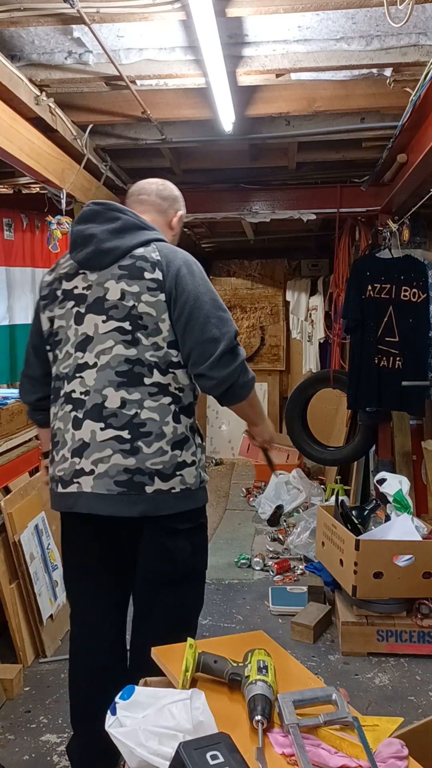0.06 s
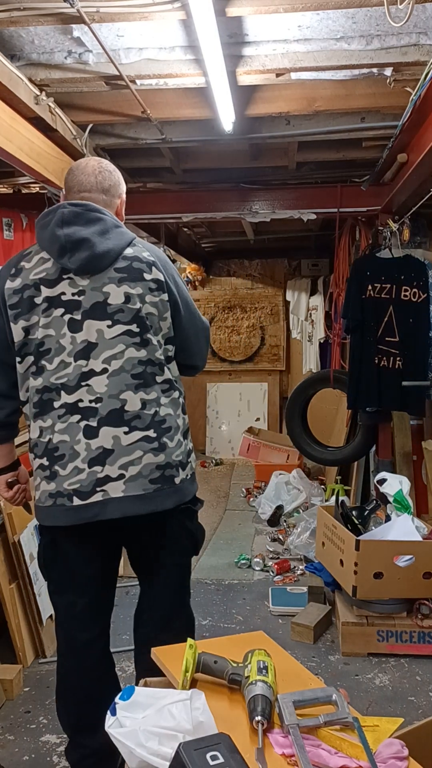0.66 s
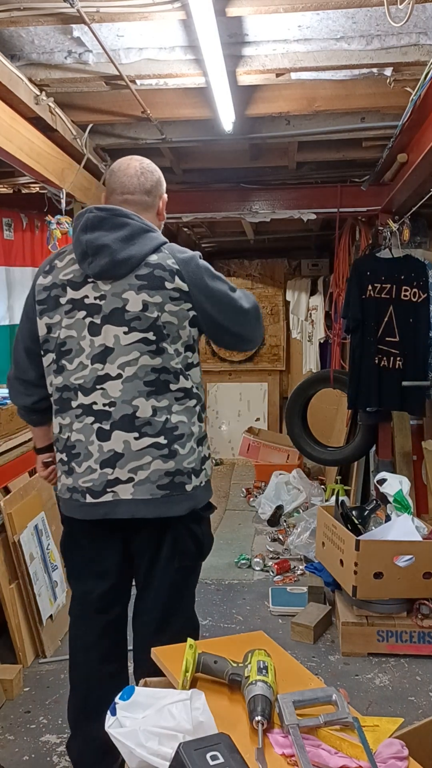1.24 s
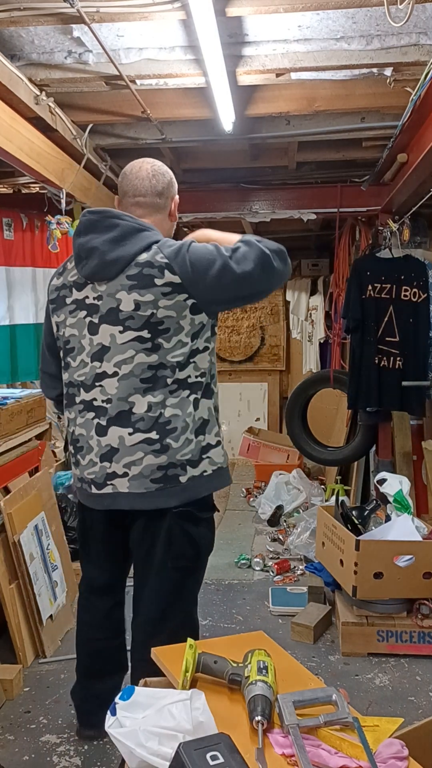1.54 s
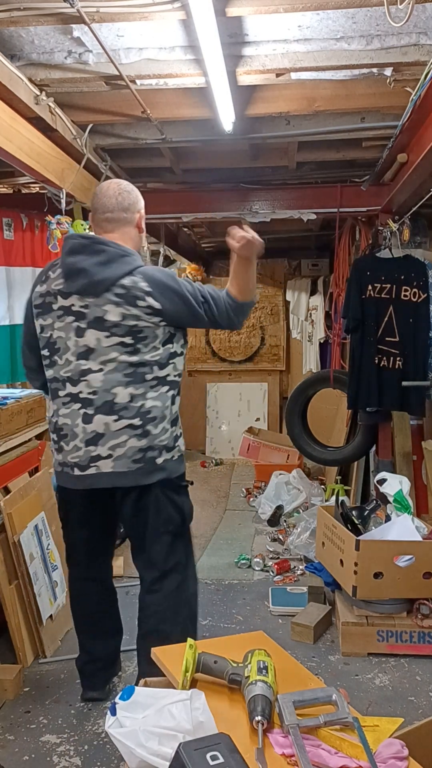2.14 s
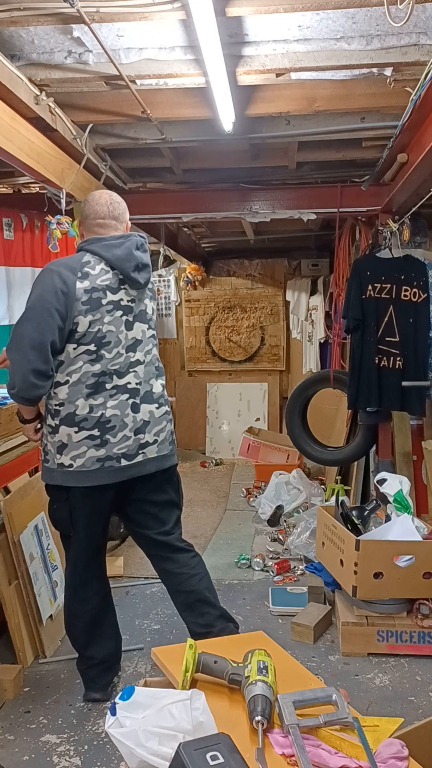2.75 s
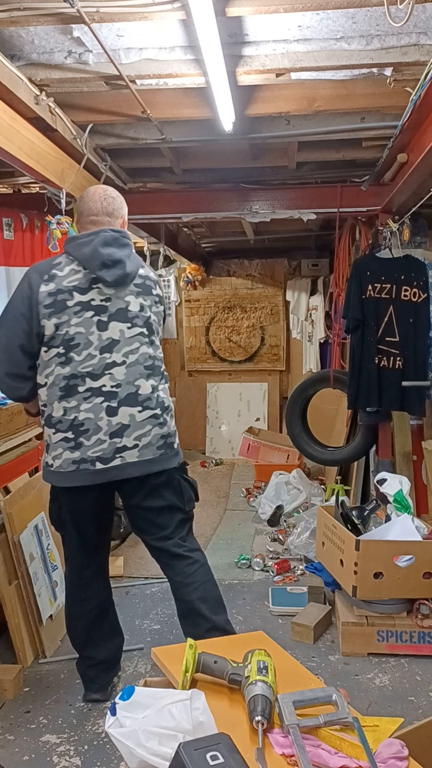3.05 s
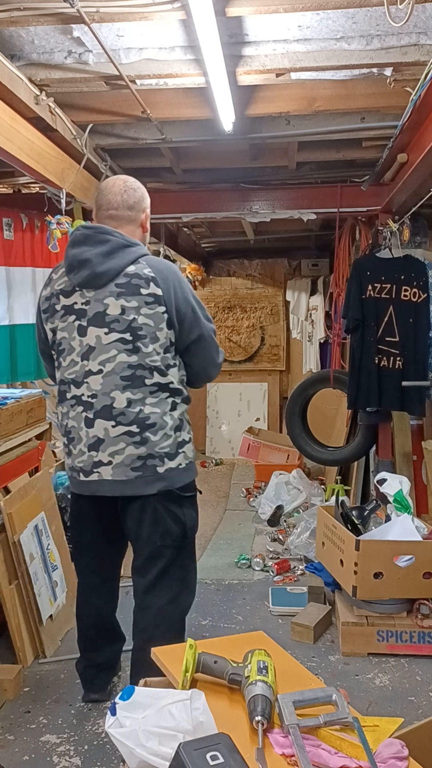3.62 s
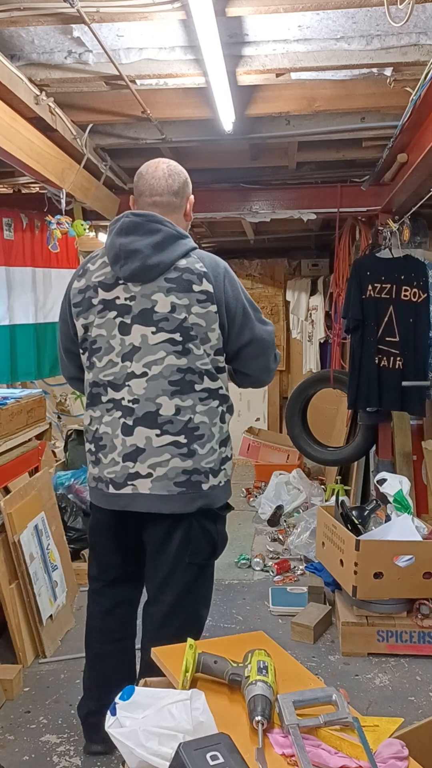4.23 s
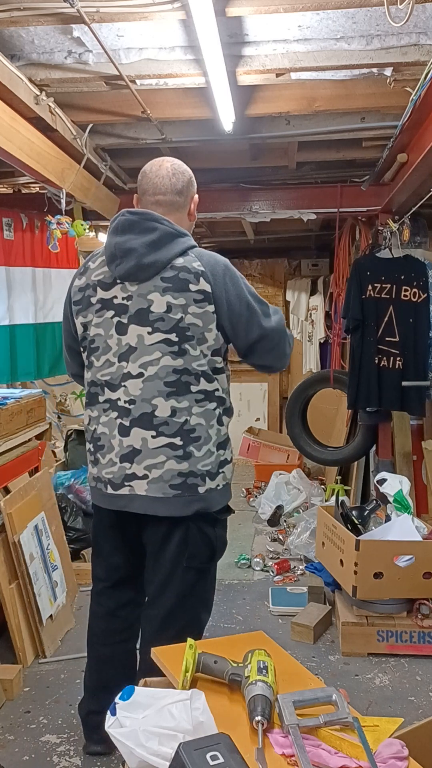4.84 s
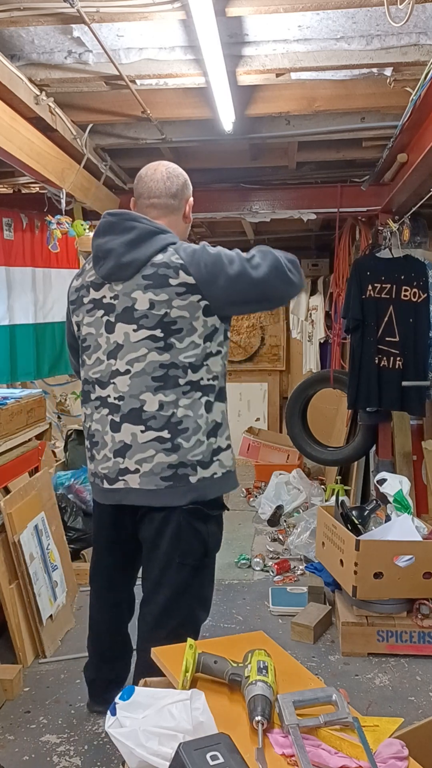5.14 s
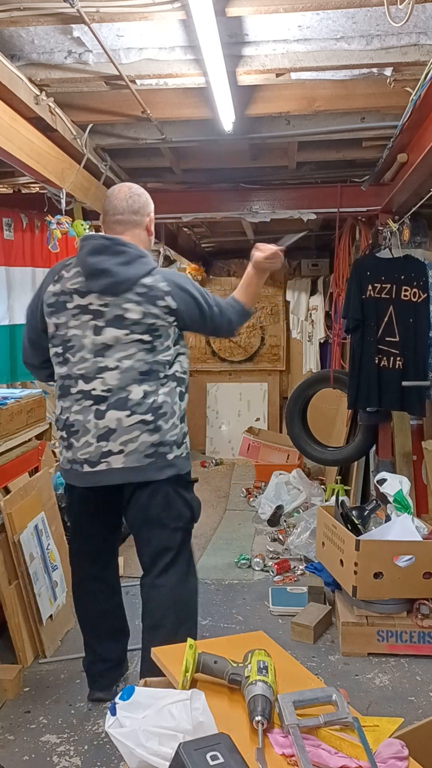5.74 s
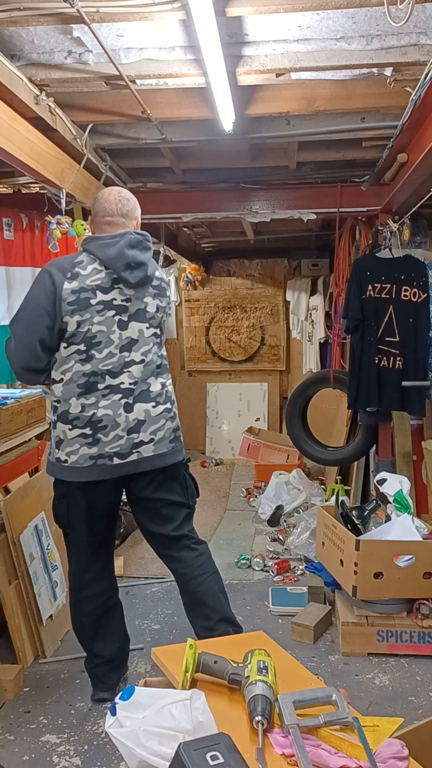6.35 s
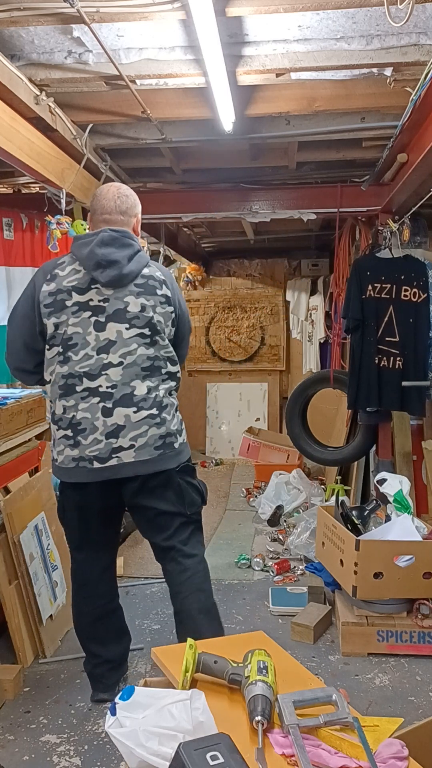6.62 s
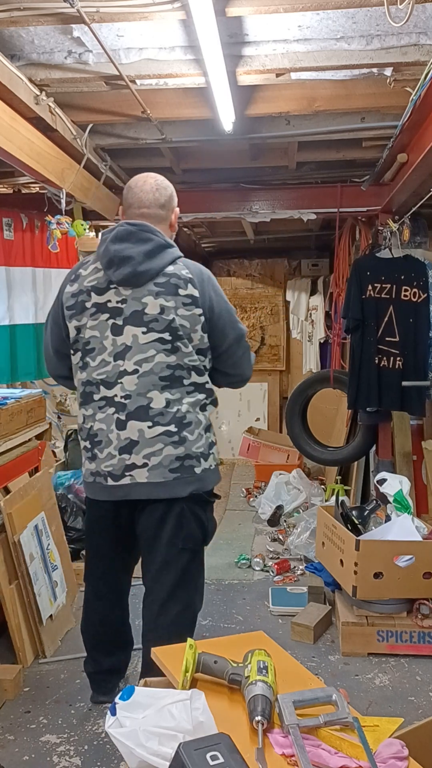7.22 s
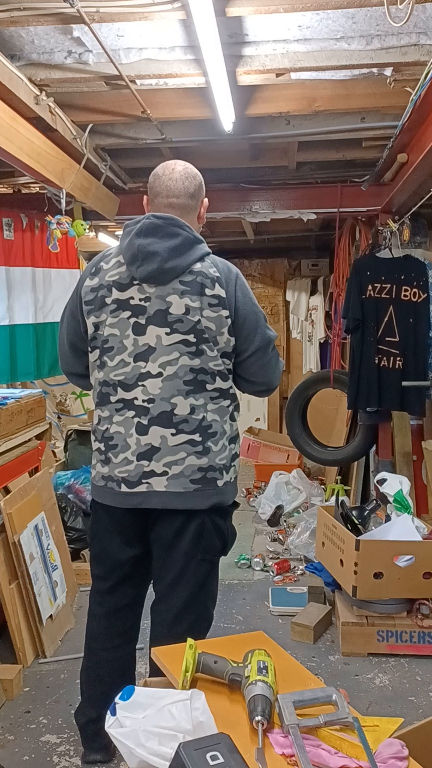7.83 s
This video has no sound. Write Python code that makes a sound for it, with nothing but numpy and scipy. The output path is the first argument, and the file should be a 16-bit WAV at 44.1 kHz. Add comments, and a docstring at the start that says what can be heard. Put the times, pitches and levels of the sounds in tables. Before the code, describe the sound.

Two knives are thrown into a wooden board about three and a half seconds apart, each with a faint hiss of release and then a loud, cracking thud that dies quickly in a small workshop. Between the throws come light steel clinks, a short rasp of blade on blade and a few scuffing steps. The hits sound slightly to the right and stand far above the soft sleeve rustle, shuffling feet and low room noise.

```python
"""Sleeves rustle and shoes shift in a quiet, cluttered workshop; then two knives thud into a target.
Each slips off the fingers with a faint swish, splits the wood fibres with its point, shudders, and
sets the wooden target and its backing board ringing. Between the throws the next blade rasps and
clinks off the others in the hand. Soles scuff on concrete, and soft room noise lies under it all."""
import sys
import numpy as np
from scipy import signal
from scipy.fft import rfft, irfft
from scipy.io import wavfile
from scipy.ndimage import uniform_filter1d, minimum_filter1d

SR = 44100
rng = np.random.default_rng(int(sys.argv[2]) if len(sys.argv) > 2 else 0)


def log_audio(samples):
    """Write samples as a 16-bit WAV file to the path given in sys.argv[1]."""
    # one column per channel
    frames = np.atleast_2d(samples).T
    # limit to full scale, then quantise
    limited = np.clip(frames, -1, 1)
    pcm = np.round(limited * 32767).astype(np.int16)
    wavfile.write(sys.argv[1], SR, pcm)


N = 347508

# one row a throw: start_s, bite_db, bite_tilt_db_per_octave, clatter_db, clatter_tilt_db_per_octave,
# shudder_hz, shudder_db, shudder_length_s
THROWS = [(2.5158, -39, -4, -22.5, -3.5, 663, -13.5, .021),
          (6.0828, -41, -5, -19, -1.45, 848, -20.5, 0.01404)]
# the point cracking in, one row a throw: pitch_hz, width_hz, crack_db, first_tick_db
CRACKS = [(2116, 310, -41.5, -40), (14000, 2500, -48.5, -52.5)]
# bright bite of splitting fibres: frequency_hz, density_db
BITE_SPECTRUM = [(500, -11), (2000, -2), (4000, 1.5), (6500, 4.5), (8500, -6.5), (11000, 6), (14500, 2.5),
                 (16000, -5.5)]
# the blade's knock on the face of the target: pitch_hz, width_hz, level_db
KNOCK_MODES = [(1150, 260, 0)]
# dense higher modes of the wood, mixed by the room: frequency_hz, density_db
CLATTER_SPECTRUM = [(25, -38), (45, -23.5), (110, -10.5), (300, -7.5), (700, -0.5), (1150, -4.5),
                    (1700, -11.5), (2300, -17), (3000, -20), (4500, -26.5), (8000, -44.5), (16000, -59.5)]
# low boom thrown back by the walls: frequency_hz, density_db
BOOM_SPECTRUM = [(50, -36), (115, 1), (175, -9.5), (245, -0.5), (330, -11.5), (480, -17.5), (800, -50.5),
                 (16000, -120)]
# weight of that boom, one value a throw: level_db
BOOM_DB = [-30.5, -23]

def knife_hits(knock_db=-28, tick_lead_s=.0013, shudder_delay_s=.0015, board_delay_s=.0038):
    """The point splits the fibres, the blade knocks and shudders, the board rings, the walls boom."""
    out = np.zeros((2, N))
    for throw, row in enumerate(THROWS):
        s, bite_db, bite_tilt, clatter_db, clatter_tilt, shudder_hz, shudder_db, shudder_s = row
        crack_hz, width_hz, crack_db, tick_db = CRACKS[throw]
        bite = amp(bite_db) * room_decay(noise(SR, BITE_SPECTRUM, tilt=bite_tilt), rise_s=.001)
        crack = amp(crack_db) * stroke(.0054, .026) * noise(SR, modes=[(crack_hz, width_hz, 0)], steep=1.4)
        tick = amp(tick_db) * stroke(.0015, .002) * noise(SR, BITE_SPECTRUM)
        splitting = (bite + crack) * grain(SR, depth_db=1.3, samples=50)
        knock = amp(knock_db) * stroke(.019, .0094) * noise(SR, modes=KNOCK_MODES, steep=2)
        clatter = room_decay(noise(SR, CLATTER_SPECTRUM, tilt=clatter_tilt), rise_s=.0045)
        thud = board_thud(spot=throw)
        boom = amp(BOOM_DB[throw]) * stroke(.062, .032) * noise(SR, BOOM_SPECTRUM)
        add(out, s - tick_lead_s, tick)
        add(out, s, splitting + knock + boom)
        add(out, s + shudder_delay_s, amp(clatter_db) * clatter)
        add(out, s + shudder_delay_s, amp(shudder_db) * blade_shudder(shudder_hz, shudder_s))
        add(out, s + board_delay_s, thud)
    return out


# body of the target on its board: pitch_hz, t60_s, first_spot_db, second_spot_db
BOARD_MODES = [(54, 0.44, -35, -38), (68, 0.39, -33, -32), (104, 0.28, -14.5, -13.5), (128, 0.24, -17, -11),
               (169, 0.28, -32, -30), (189, 0.26, -31, -19.5), (234, 0.28, -22, -29), (249, 0.24, -29, -13),
               (282, 0.24, -31, -24), (334, 0.21, -23, -14), (429, 0.25, -33, -24), (448, 0.24, -24, -30),
               (473, 0.19, -26, -19), (515, 0.23, -27, -21), (576, 0.22, -24, -29), (640, 0.16, -14.5, -25),
               (688, 0.17, -19, -21), (760, 0.16, -23, -19), (875, 0.16, -28, -18), (965, 0.16, -30, -19.5),
               (1117, 0.16, -28, -43), (1194, 0.15, -44, -29), (1249, 0.12, -27, -26),
               (1429, 0.12, -32, -39), (1503, 0.15, -49, -32), (1698, 0.14, -52, -34)]

def board_thud(spot, rise_s=.0075, spread_hz=1500):
    """The board's modes ring; where the point lands decides how strongly each one speaks."""
    t, out = np.arange(SR) / SR, np.zeros((2, SR))
    for k, (hz, t60_s, *spot_db) in enumerate(BOARD_MODES):
        # short waves reach the two sides out of step
        phase = np.array([[1], [-1]]) * rng.standard_normal() * hz / spread_hz / 2
        # neighbouring modes start in opposite directions, so the thud blooms
        ring = (-1) ** k * np.sin(2 * np.pi * hz * t + phase) * amp(-60 * t / t60_s)
        out += amp(spot_db[spot]) * pan_gains(curve(SOURCE_PAN, hz))[:, None] * ring
    return out * (1 - np.exp(-t / rise_s))


def blade_shudder(hz, length_s, taper=.3):
    """The blade shakes while it digs in, until the wood grips it."""
    t = np.arange(round(length_s * SR)) / SR
    burst = np.sin(2 * np.pi * hz * t) * signal.windows.tukey(len(t), taper)
    return pan_gains(curve(SOURCE_PAN, hz))[:, None] * burst


# blade along blade, light and then pressed:
# start_s, length_s, level_db, swell_db_per_s, ring_vs_rasp_db, low_notes_vs_rasp_db
DRAWS = [(3.36, 0.163, -70, 66, 0.63, 4.6), (3.535, 0.078, -57.5, 10, 5, 11.2)]
# dry rasp of steel on steel: frequency_hz, density_db
RASP_SPECTRUM = [(300, -34), (1200, 9), (2300, -1), (2850, -8), (3400, 12), (4300, -8.5), (5200, 17),
                 (7000, -10), (8600, -13), (10500, -18), (12800, 5), (13500, -28.5), (16000, -32)]
# the blades' low singing notes: pitch_hz, width_hz, level_db
LOW_NOTES = [(1700, 33, -5.5), (3125, 27, -9), (3330, 23, -8.5), (5056, 37, 4.5), (5100, 90, -9),
             (5640, 60, -27)]
# their other resonances: pitch_hz, width_hz, level_db
STEEL_MODES = [(2030, 54, -21), (2350, 200, -27), (3440, 140, -21.5), (4430, 460, -25), (5530, 53, -12),
               (7290, 210, -12.5), (9930, 79, -9), (11400, 110, -14), (12500, 100, -17), (14700, 120, -20)]

def blade_draw(grip_s=.01, let_go_s=.023, sing_s=.019):
    """Steel rubs on steel and rings as the next knife is drawn from the hand."""
    t, out = np.arange(SR) / SR, np.zeros((2, N))
    for s, length_s, db, swell, ring_db, notes_db in DRAWS:
        pressure = amp(db + swell * np.minimum(t, length_s))
        rubbing = np.minimum(t / grip_s, 1) * pressure * np.exp(-np.maximum(t - length_s, 0) / let_go_s)
        ring = amp(ring_db) * noise(SR, modes=STEEL_MODES)
        rasp = noise(SR, RASP_SPECTRUM) * grain(SR, depth_db=5.5)
        notes = amp(notes_db) * noise(SR, modes=LOW_NOTES) * grain(SR, depth_db=.5, samples=300)
        # the low notes build up and ring on behind the rubbing
        add(out, s, rubbing * (ring + rasp) + follow(rubbing, sing_s) * notes)
    return out


# light touches: start_s, level_db, rise_s, fade_s, tilt_db_per_octave, low_notes_vs_clink_db
CLINKS = [(2.902, -70.5, 0.017, 0.063, -7, -4), (2.943, -65, 0.029, 0.032, 1, 2),
          (3.18, -78, 0.023, .02, -9, -8), (6.618, -76.5, 0.0087, 0.026, 5.5, 6.5)]
# blades gripped together: pitch_hz, width_hz, level_db
GRIPPED_MODES = [(1660, 88, -8), (3520, 170, -11), (4930, 200, -12), (5420, 240, -2), (5862, 130, -13),
                 (6230, 550, -17), (7380, 220, -14), (10000, 92, -12), (11480, 67, -16), (12750, 120, -20)]

def blade_clinks():
    """The held blades touch and ring briefly, damped by the hand."""
    out = np.zeros((2, N))
    for s, db, rise_s, fade_s, tilt, notes_db in CLINKS:
        clink = noise(SR, modes=GRIPPED_MODES, tilt=tilt)
        notes = amp(notes_db) * noise(SR, modes=LOW_NOTES)
        add(out, s, amp(db) * stroke(rise_s, fade_s) * (clink + notes))
    return out


# letting go: start_s, level_db, hiss_tilt_db_per_octave, ring_vs_hiss_db, ring_rise_s, ring_fade_s
RELEASES = [(2.224, -63, 2.2, -2, .075, 0.077), (5.793, -60.5, -0.5, 1.5, 0.082, 0.034)]
# swish of steel over skin: frequency_hz, density_db
SWISH_SPECTRUM = [(60, -4.5), (220, 4.5), (600, 13.5), (1600, 7), (2800, -7), (4000, -9), (5600, -0.5),
                  (6700, -1), (8400, -21), (10000, -2), (12000, -1.5), (16000, -5)]
# shimmer of the freed blade: pitch_hz, width_hz, first_knife_db, second_knife_db
FREE_BLADE_MODES = [(3112, 120, -5, -24), (5050, 140, -1, -18), (6960, 90, 1, -7.5), (7480, 150, -5, -22),
                    (9490, 50, 0, -0.5), (9700, 350, -5.5, -13.5), (11000, 200, -5.5, -16.5),
                    (12220, 60, 5.5, -3.5), (12720, 200, -7, -27), (14150, 151.6, -5.5, -18),
                    (15390, 120, 0, -21)]

def knife_releases():
    """The thrown blade hisses over the fingers and sings faintly."""
    out = np.zeros((2, N))
    for knife, (s, db, tilt, ring_db, rise_s, fade_s) in enumerate(RELEASES):
        modes = [(hz, width_hz, knife_db[knife]) for hz, width_hz, *knife_db in FREE_BLADE_MODES]
        hiss = stroke(rise_s=.045, fade_s=.12) * noise(SR, SWISH_SPECTRUM, tilt=tilt)
        ring = amp(ring_db) * stroke(rise_s, fade_s) * noise(SR, modes=modes) * grain(SR, depth_db=2)
        add(out, s, amp(db) * (hiss + ring))
    return out


# shoe scuffs: start_s, level_db, length_s, tilt_db_per_octave
SCUFFS = [(3.69, -62, 0.092, -2), (4.1, -68.5, .09, -5.5), (4.222, -51.5, 0.092, 1), (7.135, -58, 0.09, -2)]
# scrape of a sole: frequency_hz, density_db
SOLE_SPECTRUM = [(40, -19), (130, -10), (230, -4), (380, 2), (800, 6.5), (1500, 2.5), (2300, -7.5),
                 (3400, -20), (4600, -11), (8500, -24), (11000, -18.5), (16000, -32)]
# footfalls: start_s, level_db, length_s, tilt_db_per_octave
TREADS = [(.42, -66, 0.084, 1), (.85, -73, 0.087, -10), (1.99, -68.5, 0.11, -5), (3.54, -67.5, 0.13, -6),
          (3.93, -71.5, 0.25, -11), (4.26, -57, 0.049, 15), (5.1, -71, 0.1, 5), (6.66, -68.5, 0.057, 1),
          (7.07, -66.5, .09, -4)]
# dull thump of the floor: frequency_hz, density_db
FLOOR_SPECTRUM = [(25, -27), (55, 1.5), (90, 4), (150, -28), (230, -21), (400, -30), (1500, -118),
                  (16000, -150)]

def footsteps():
    """Soles scuff on concrete and weight lands on the floor."""
    scuffs = rubs(SCUFFS, SOLE_SPECTRUM, grain_db=-.6, rise_share=.68)
    treads = rubs(TREADS, FLOOR_SPECTRUM, grain_db=3.5, rise_share=.29)
    return scuffs + treads


# soft bumps: start_s, level_db
BUMPS = [(.08, -71), (1.62, -70), (1.881, -70), (2.29, -68), (3.004, -65), (5.41, -64)]
# their hollow note, also the room's drone: pitch_hz, width_hz, level_db
HOLLOW_MODES = [(236, 13, 0)]
# voice of the creak underfoot: pitch_hz, width_hz, level_db
CREAK_MODES = [(228, 40, 6.5), (748, 70, -1), (1080, 200, -6), (1380, 60, 2.5), (1780, 170, -3),
               (2700, 200, -9), (3400, 350, -10.5), (5200, 900, -20), (11500, 2500, -30)]

def weight_shifts(creak_start_s=7.785, creak_db=-55):
    """Hollow bumps and one short creak as the thrower's weight moves."""
    out = np.zeros((2, N))
    for s, db in BUMPS:
        add(out, s, amp(db) * stroke(.013, .021) * noise(SR, modes=HOLLOW_MODES))
    add(out, creak_start_s, amp(creak_db) * stroke(.022, .035) * noise(SR, modes=CREAK_MODES))
    return out


# cloth moves: start_s, level_db, length_s, tilt_db_per_octave
RUSTLES = [(.2, -70, .09, -3.5), (.3, -69, 0.062, -1.5), (1.59, -65.5, 0.1, 3.5), (2.06, -81.5, .3, 8),
           (3.74, -77.5, 0.18, -0.5), (3.94, -72, 0.097, .5), (4.81, -82, 0.2, 2), (5.6, -77.5, .3, 4),
           (7.19, -77.5, 0.25, -2.5)]
# brush of fabric: frequency_hz, density_db
CLOTH_SPECTRUM = [(300, -4.5), (1500, 8), (3000, -4.5), (5000, 2), (6500, 2), (8300, -15), (11000, -6.5),
                  (16000, -22.5)]

def clothes(whisper_db=-86.5, sway_db=5, sway_s=.22):
    """Sleeves and trousers rustle, and whisper faintly as the thrower sways."""
    rustles = rubs(RUSTLES, CLOTH_SPECTRUM, grain_db=1, rise_share=.43)
    sway = np.tanh(wander(N, int(sway_s * SR)))
    return rustles + amp(whisper_db + sway_db * sway) * noise(N, CLOTH_SPECTRUM)


# room tone: frequency_hz, density_db
ROOM_SPECTRUM = [(20, -37.5), (40, -27), (65, -6.5), (105, -3.5), (170, -11), (235, -14.5), (300, -13),
                 (500, -13.5), (650, -9.5), (780, -0.5), (950, 0.5), (1280, -3), (1900, -23), (3400, -31),
                 (6200, -35), (9000, -37), (13500, -32), (16000, -40)]
# where it sits: frequency_hz, left_minus_right_db
ROOM_PAN = [(60, -2.5), (380, 0), (700, -8.5), (1290, -14), (2380, -1), (8000, -2.5), (15000, 0)]

def room_tone(start_db=-63.5, drift_db_per_s=-.2158, waver_db=.55, waver_s=.4, drone_db=-84):
    """Soft room noise, mostly to the right, wavers and sinks slowly over a faint hollow drone."""
    level_db = start_db + drift_db_per_s * np.arange(N) / SR + waver_db * wander(N, int(waver_s * SR))
    bed = amp(level_db) * noise(N, ROOM_SPECTRUM, pan=ROOM_PAN)
    return bed + amp(drone_db) * noise(N, modes=HOLLOW_MODES)


# the workshop's short tail: frequency_hz, t60_s
ROOM_T60 = [(50, 0.63), (200, 0.29), (700, 0.26), (2000, 0.23), (6000, 0.22), (15000, 0.24)]

def room_decay(x, rise_s):
    """Each band swells quickly and then fades with the room's decay time."""
    hz, t, bands = signal.stft(x, SR, nperseg=256)
    decay = amp(-60 * t / curve(ROOM_T60, hz)[:, None])
    faded = signal.istft(bands * decay, SR, nperseg=256)[1][:, :x.shape[1]]
    return faded * (1 - np.exp(-np.arange(x.shape[1]) / SR / rise_s))


# stereo width, narrow lows and wide highs: frequency_hz, left_right_likeness
LIKENESS = [(60, 0.8), (300, 0.88), (700, 0.84), (1400, 0.34), (3000, -0.14), (7000, 0), (16000, 0.02)]
# the action sits to the right: frequency_hz, left_minus_right_db
SOURCE_PAN = [(60, -1), (380, -0.5), (700, -5.5), (1290, -8), (2400, -6), (15000, -3.5)]

def noise(size, spectrum=None, modes=(), tilt=0, pan=SOURCE_PAN, steep=1.15):
    """Stereo noise of rms 1, coloured by a spectrum or by resonances and tilted in dB per octave."""
    hz = np.fft.rfftfreq(size, 1 / SR)
    left, other = rfft(rng.standard_normal((2, size)))
    likeness = np.clip(curve(LIKENESS, hz), 0, 1)
    pair = np.array([left, likeness * left + np.sqrt(1 - likeness ** 2) * other])
    if spectrum is None:
        peaks = (amp(2 * db) / (1 + (2 * (hz - f) / width) ** 2) ** steep for f, width, db in modes)
        colour = np.sqrt(sum(peaks))
    else:
        colour = amp(curve(spectrum, hz))
    slope = amp(tilt * np.log2(np.maximum(hz, 100) / 1000))
    return unit(irfft(pair * colour * slope * pan_gains(curve(pan, hz)), size))


def rubs(rows, spectrum, grain_db, rise_share):
    """Grainy strokes of shoe or cloth; each swells for a share of its length, then fades."""
    out = np.zeros((2, N))
    for s, db, length_s, tilt in rows:
        envelope = stroke(rise_share * length_s, (1 - rise_share) * length_s)
        add(out, s, amp(db) * envelope * noise(SR, spectrum, tilt=tilt) * grain(SR, grain_db))
    return out


def stroke(rise_s, fade_s):
    """One second of envelope: a smooth swell, then an exponential fade."""
    t = np.arange(SR) / SR
    swell = np.sin(np.pi / 2 * np.minimum(t / rise_s, 1)) ** 2
    return swell * np.exp(-np.maximum(t - rise_s, 0) / fade_s)


def grain(size, depth_db, samples=130):
    """Uneven grip of two rubbing surfaces, changing every few milliseconds."""
    return unit(amp(depth_db * wander(size, samples)))


def wander(size, samples):
    """Random motion of rms 1, smoothed over this many samples."""
    return unit(uniform_filter1d(rng.standard_normal(size), samples))


def follow(x, lag_s):
    """Follows x smoothly with the given time constant."""
    keep = np.exp(-1 / (lag_s * SR))
    return signal.lfilter([1 - keep], [1, -keep], x)


def pan_gains(pan_db):
    """Left and right gains that keep the total power."""
    gains = amp(np.array([pan_db, -pan_db]) / 2)
    return gains / np.sqrt(np.mean(gains ** 2, axis=0))


def curve(points, hz):
    """Joins (frequency_hz, value) points on a log-frequency axis."""
    point_hz, value = np.transpose(points)
    return np.interp(np.log(hz + 1), np.log(point_hz + 1), value)


def amp(db):
    """Decibels to gain."""
    return 10 ** (np.asarray(db) / 20)


def unit(x):
    """Scales to rms 1."""
    return x / np.sqrt(np.mean(x ** 2) + 1e-20)


def add(mix, start_s, sound):
    """Mixes a stereo sound in at start_s."""
    part = mix[:, round(start_s * SR):][:, :sound.shape[1]]
    part += sound[:, :part.shape[1]]


def gain_control(x, threshold_db=-32, duck_db=1.5, hold_s=.88, ease_s=.053):
    """A loud sound ducks the level by up to duck_db; it holds there, then eases back."""
    level_db = 10 * np.log10(follow((x ** 2).mean(0), lag_s=.005) + 1e-12)
    wanted_db = -np.clip(level_db - threshold_db, 0, duck_db)
    half_hold = round(hold_s * SR / 2)
    held_db = minimum_filter1d(wanted_db, 2 * half_hold + 1, origin=half_hold)
    return x * amp(follow(held_db, ease_s))


def scene():
    """Knives up front, the thrower's movements behind them, room tone underneath."""
    thrower = footsteps() + weight_shifts() + clothes()
    knives = knife_hits() + blade_draw() + blade_clinks() + knife_releases()
    return knives + thrower + room_tone()


def record(dry, low_cut_hz=46, high_cut_hz=15900):
    """The microphones' low cut, then gain control and a steep high cut."""
    thinned = signal.sosfilt(signal.butter(4, low_cut_hz, "highpass", fs=SR, output="sos"), dry)
    high_cut = signal.firwin(511, high_cut_hz, window=("kaiser", 9), fs=SR)
    return signal.oaconvolve(gain_control(thinned), high_cut[None], "same")


dry = scene()
out = record(dry)
log_audio(out)
```